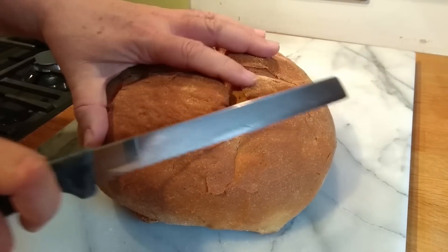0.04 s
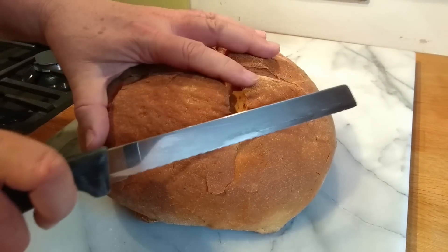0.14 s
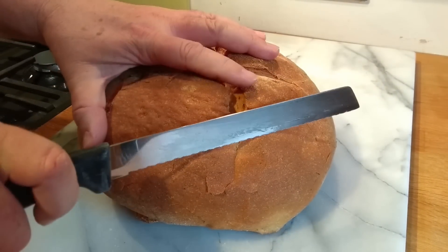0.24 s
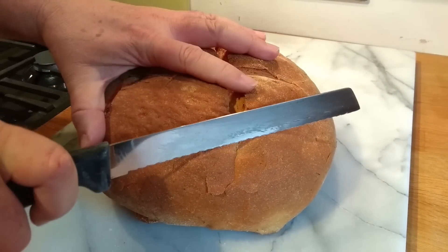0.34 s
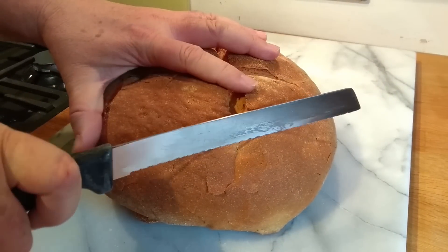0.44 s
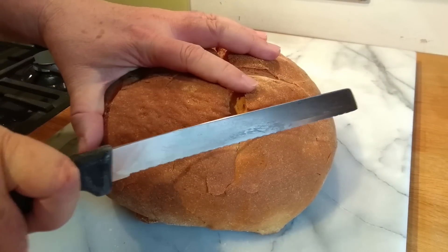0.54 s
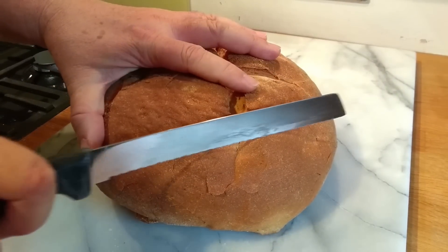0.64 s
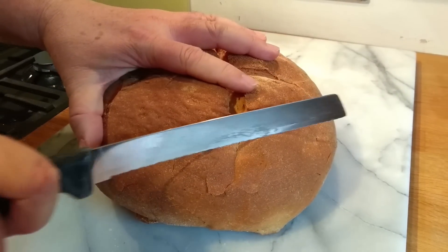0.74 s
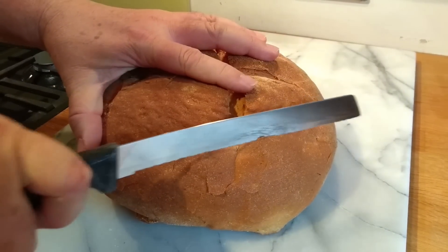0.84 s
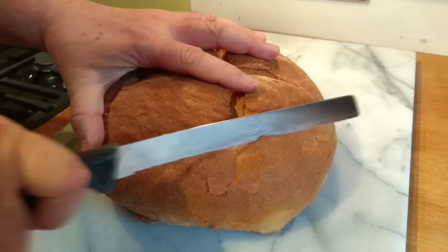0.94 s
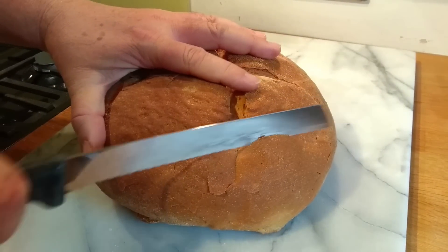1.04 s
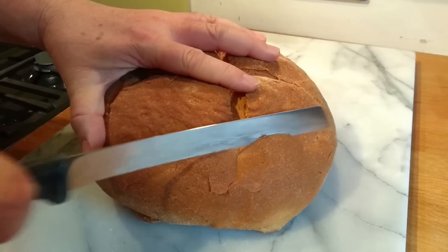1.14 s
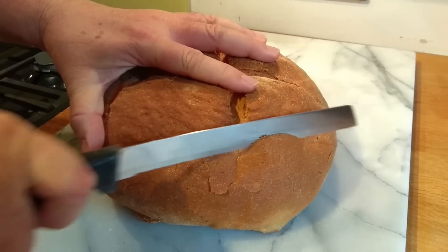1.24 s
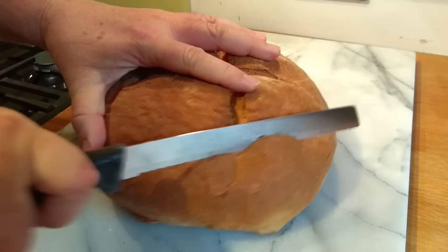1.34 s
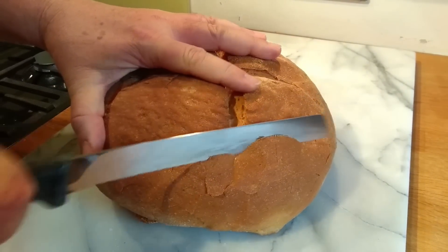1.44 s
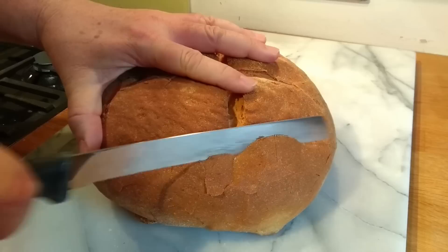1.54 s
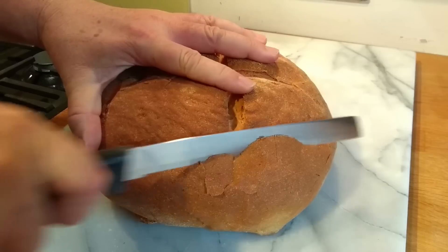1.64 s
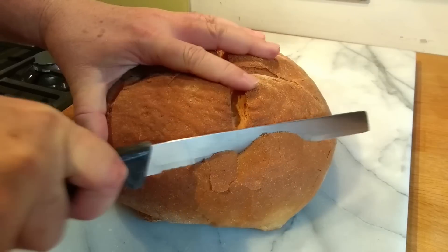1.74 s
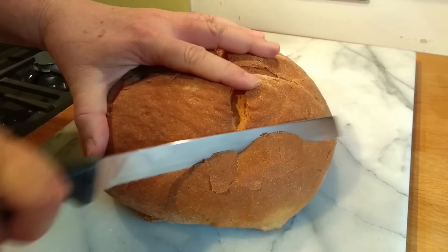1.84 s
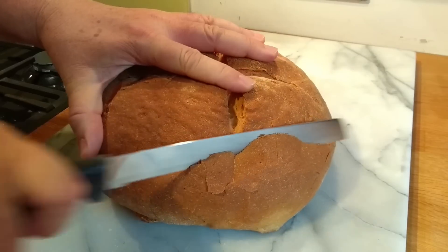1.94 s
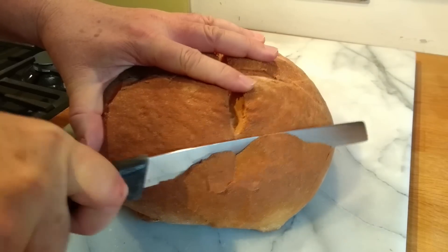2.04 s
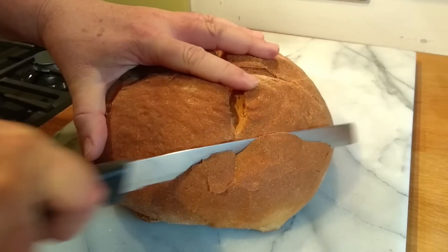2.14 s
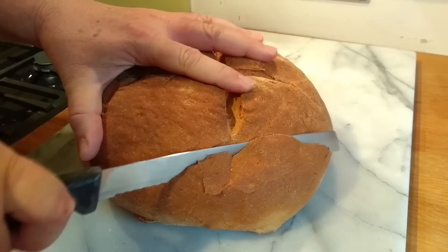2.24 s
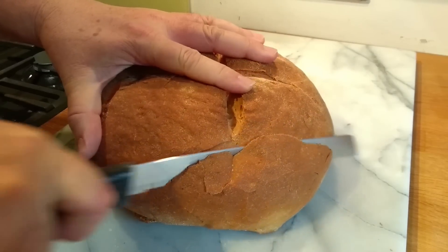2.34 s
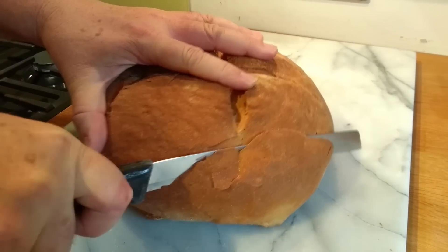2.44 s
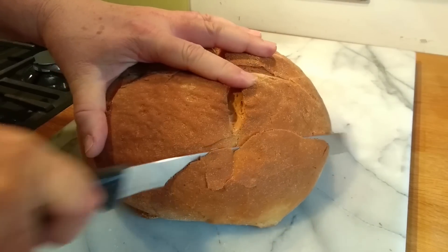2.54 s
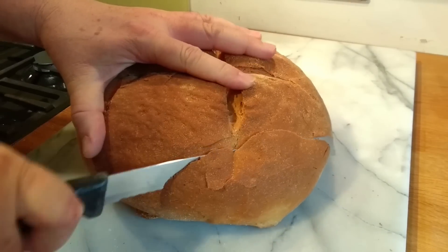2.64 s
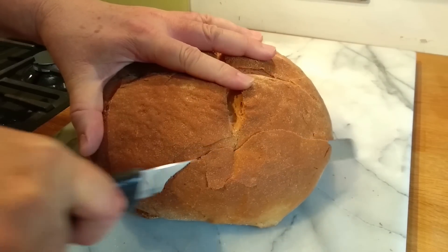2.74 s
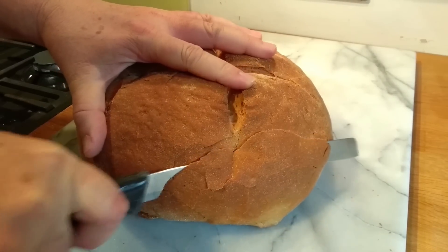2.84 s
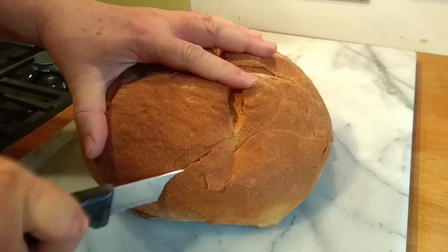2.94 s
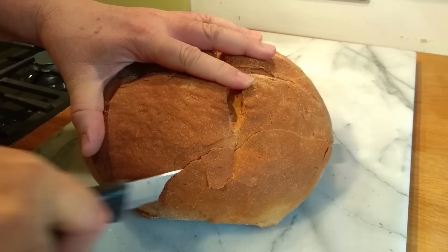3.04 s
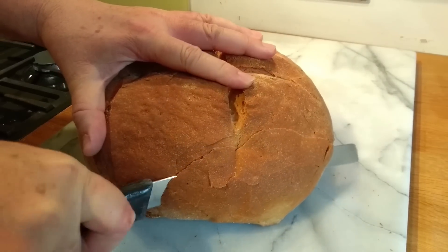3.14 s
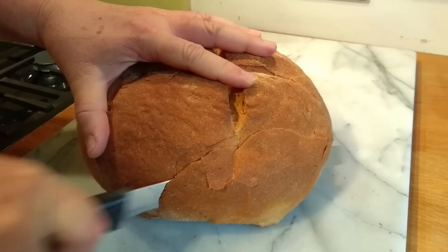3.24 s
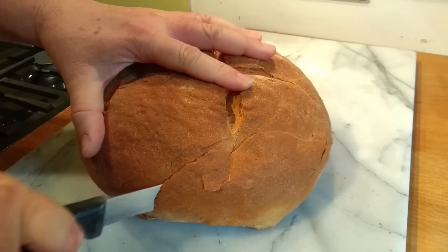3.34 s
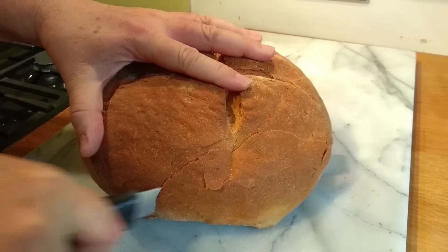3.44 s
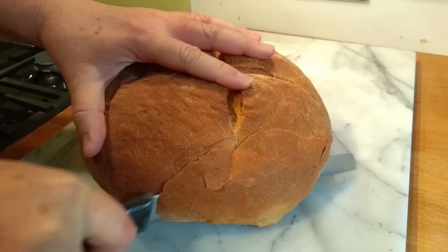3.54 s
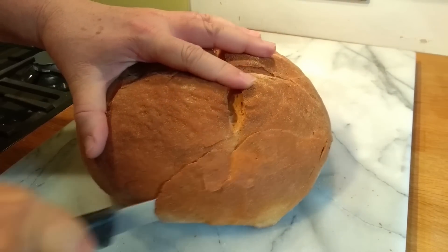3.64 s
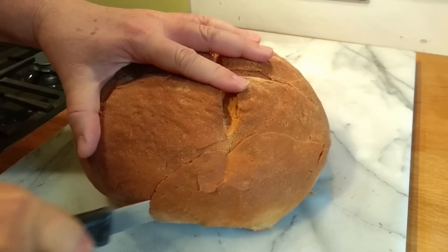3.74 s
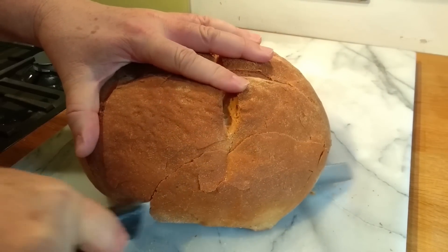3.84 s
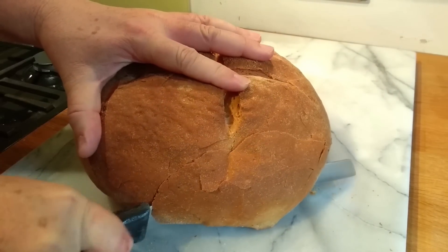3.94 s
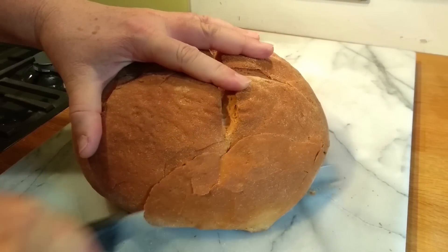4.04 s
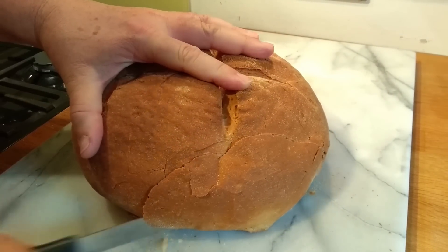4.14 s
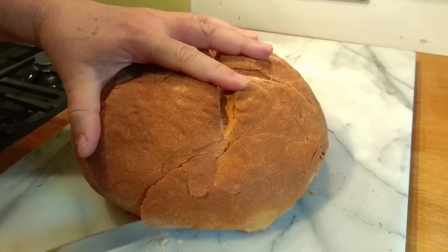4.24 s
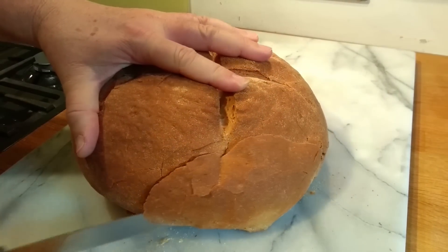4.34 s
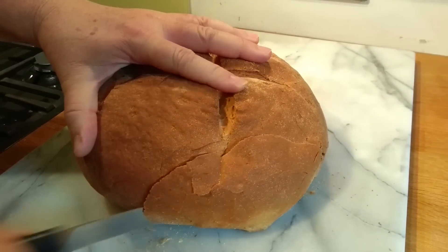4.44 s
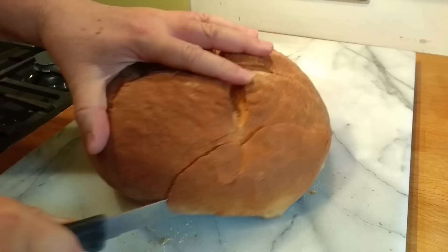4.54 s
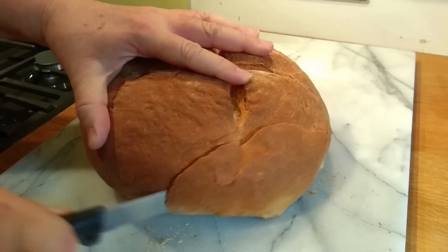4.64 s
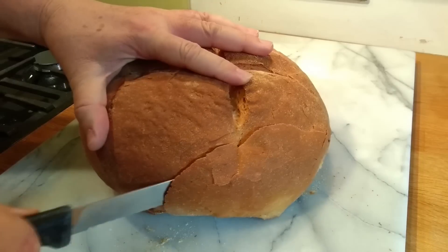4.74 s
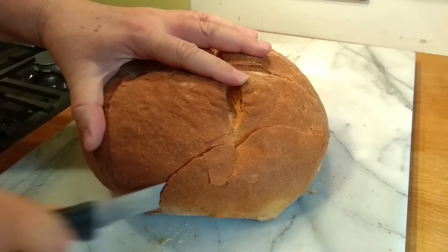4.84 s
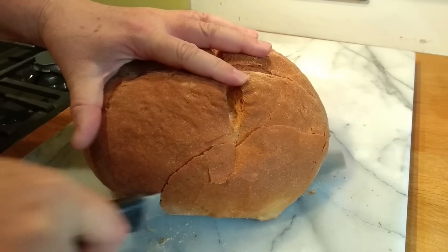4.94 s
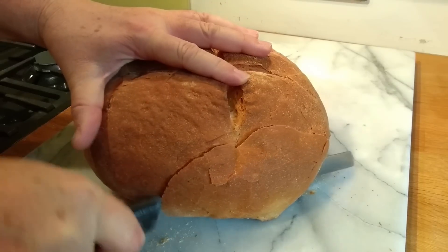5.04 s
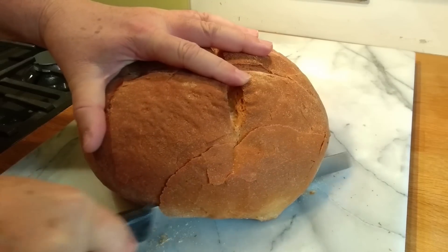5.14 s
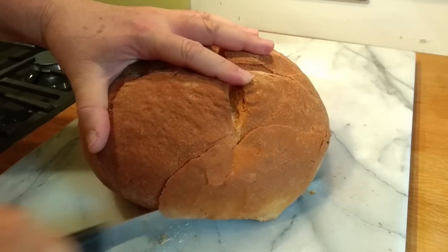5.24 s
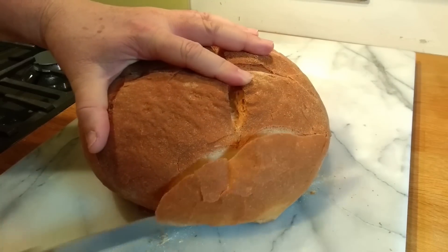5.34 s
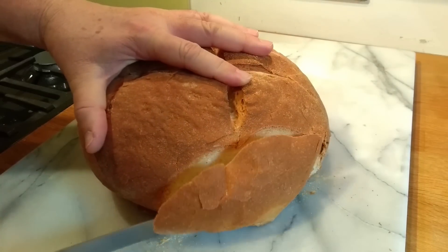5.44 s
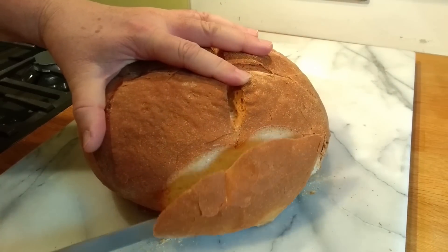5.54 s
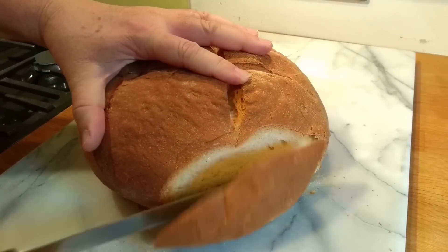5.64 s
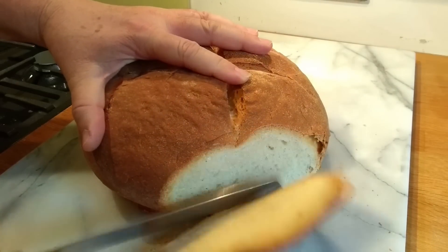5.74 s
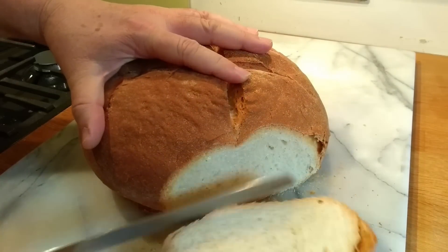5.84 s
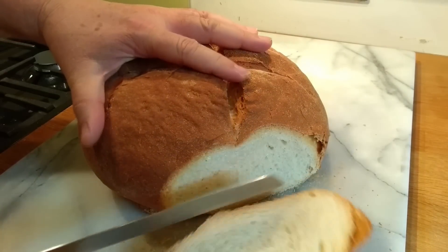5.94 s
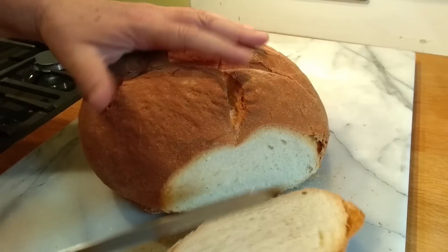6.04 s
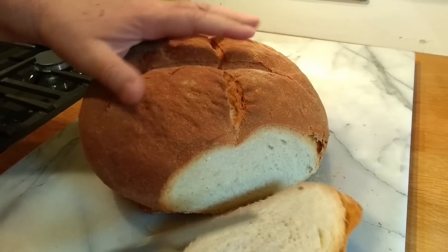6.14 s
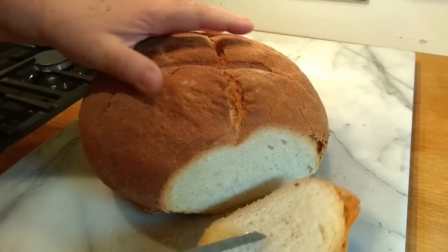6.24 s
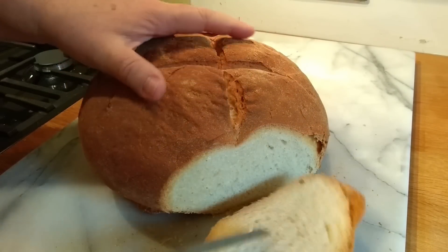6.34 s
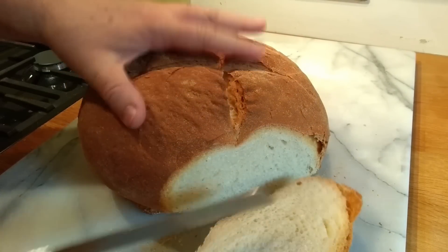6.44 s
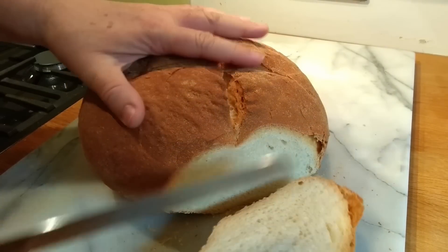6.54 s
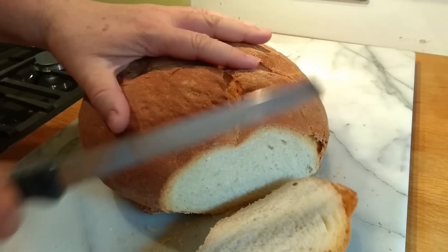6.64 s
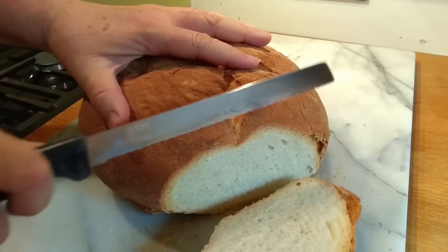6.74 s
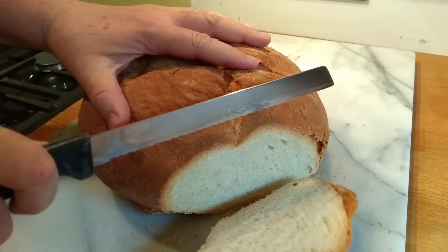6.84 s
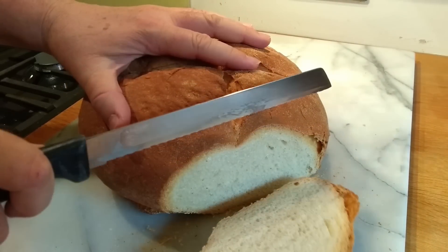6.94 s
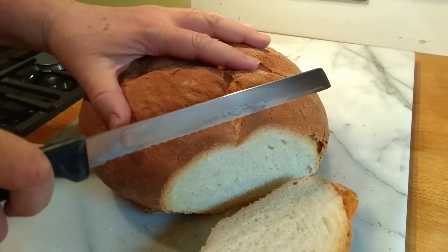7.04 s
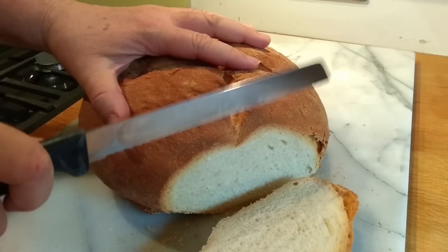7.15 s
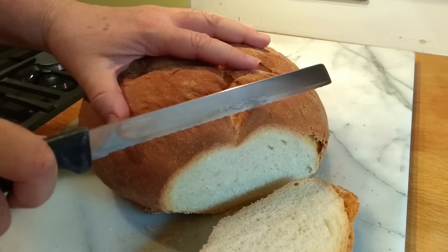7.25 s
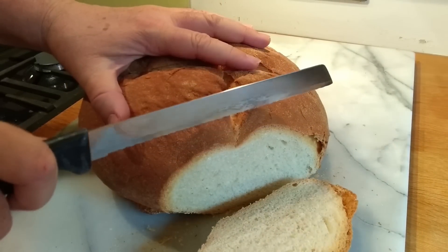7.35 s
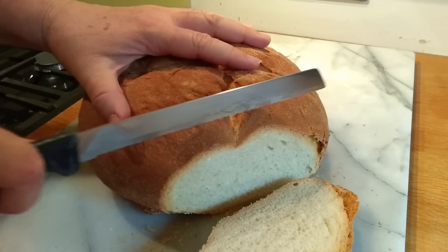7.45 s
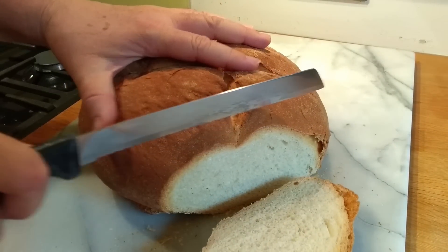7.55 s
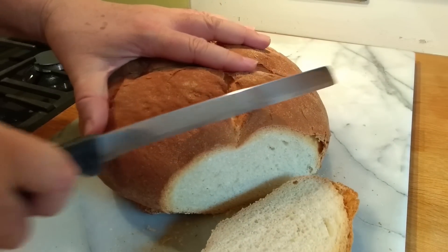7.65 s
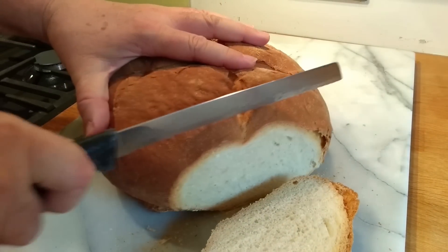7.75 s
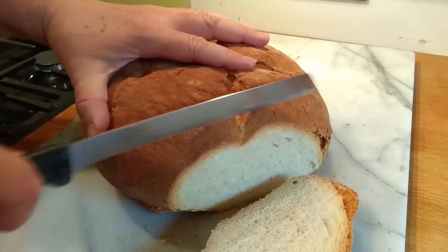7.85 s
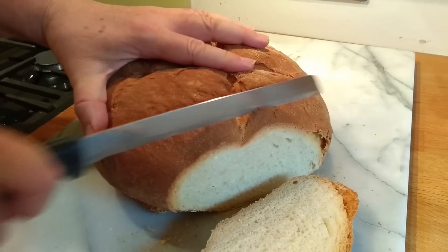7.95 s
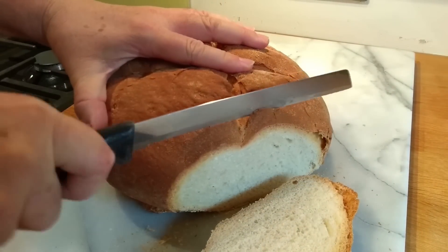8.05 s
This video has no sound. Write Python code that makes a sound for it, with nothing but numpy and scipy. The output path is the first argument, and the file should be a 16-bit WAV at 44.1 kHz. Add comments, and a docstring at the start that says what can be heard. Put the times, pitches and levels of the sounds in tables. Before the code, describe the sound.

Close, rhythmic sawing of a bread knife through hard crust, with sharp cracks and a few knocks and scrapes on stone.

```python
"""A quiet kitchen, the phone microphone close to a crusty loaf on a stone slab.
A serrated knife saws through it: the teeth catch and shake the loaf, the crust crumbles and cracks,
the inside tears, and the slab rocks on the counter. Blade, handle and the falling slice knock on the
stone, the edge drags over it and fingers brush the crust, all with a short room tail and a faint hush."""
import sys
import numpy as np
from scipy import signal
from scipy.fft import rfft, irfft, next_fast_len
from scipy.io import wavfile
from scipy.ndimage import uniform_filter1d, map_coordinates

SR = 44100
rng = np.random.default_rng(int(sys.argv[2]) if len(sys.argv) > 2 else 0)


def wav_record(signal):
    """Record a signal, one row per channel, as 16-bit PCM in the file named by sys.argv[1]."""
    frames = np.transpose(np.atleast_2d(signal))
    bounded = np.clip(frames, -1, 1)
    # unit amplitude maps onto the largest positive 16-bit level
    quanta = np.round(bounded * 32767).astype(np.int16)
    wavfile.write(sys.argv[1], SR, quanta)


N = 357651

# Saw strokes. Each row: time of full pressure, rise, hold and release in seconds, then in dB the swell
# over the hold, crumbling, loaf shaking, tearing, slab rocking and counter drumming.
SAW_STROKES = [(0.635, 0.056, .02, 0.1, -5, -45, -37.5, -50.5, -46, -44),
               (0.802, .035, .06, 0.2, 1.5, -39.5, -34, -44.5, -42.5, -41.5),
               (0.992, 0.029, .07, 0.19, -4, -31.5, -28, -34, -40, -37.5),
               (1.203, 0.047, .075, 0.18, -5.5, -28.5, -23, -30.5, -31.5, -29),
               (1.406, 0.038, .055, 0.19, -3, -28.5, -25, -32, -30.5, -36),
               (1.601, 0.051, .075, 0.19, 1.5, -28, -23.5, -29, -43, -34.5),
               (1.802, 0.038, .065, 0.15, 2.5, -30, -31.5, -32, -44.5, -39.5),
               (1.988, 0.039, .09, 0.17, 5, -30, -31, -32, -48, -37.5),
               (2.195, 0.043, .05, 0.16, -5, -23.5, -27.5, -25, -36.5, -35),
               (2.367, 0.032, .04, 0.16, 3, -23.5, -25.5, -26.5, -41.5, -29),
               (2.561, 0.038, .04, 0.11, -1.5, -24.5, -25.5, -30.5, -57.5, -30.5),
               (2.73, 0.042, .07, .11, -4.5, -24.5, -19.5, -26, -39.5, -30),
               (2.905, .045, .055, 0.084, -1.5, -29.5, -27.5, -34, -44, -45),
               (3.052, 0.03, .07, 0.1, 4, -33.5, -27, -35.5, -56.5, -33.5),
               (3.266, 0.036, .045, 0.078, 1.5, -31, -35.5, -43, -60, -68),
               (3.433, 0.034, .045, .14, 3, -30, -28.5, -37, -54, -34.5),
               (3.642, 0.04, .03, 0.078, 2, -35.5, -39.5, -48.5, -62, -62),
               (3.802, 0.024, .09, 0.065, 1, -40, -38.5, -47.5, -41.5, -36.5),
               (4.048, .022, .045, 0.22, 7.5, -39.5, -40, -46.5, -63.5, -57),
               (4.182, 0.091, .006, .03, 14, -48.5, -42, -47, -53.5, -38.5),
               (4.543, 0.041, .02, 0.12, -6.5, -59.5, -40, -52, -50, -66),
               (4.622, 0.054, .015, 0.11, -2, -56.5, -81, -66, -42.5, -82),
               (4.918, 0.029, .07, 0.12, 1.5, -36.5, -35, -40, -51.5, -42),
               (5.244, 0.08, .06, .01, 5.5, -37.5, -33, -36, -52.5, -39.5),
               (7.502, 0.065, .005, 0.094, 4, -73, -43.5, -91, -52, -53),
               (7.651, 0.056, .04, 0.14, 1, -41, -30, -45, -45.5, -36.5),
               (7.799, 0.034, .055, 0.19, -1, -39.5, -26.5, -40.5, -49, -36.5),
               (7.955, .03, 0.062, 0.2, 2, -36, -26.5, -37, -45, -34),
               (8.105, 0.12, .02, .05, 1, -43.5, -41, -49.5, -41, -44.5)]
# For those five sounds in turn: the exponent on pressure, and the lag in seconds.
PRESSURE_POWERS = [3.4, 3.97, 3.8, 1, 3.8]
LAGS_S = [-0.005, -0.0021, 0.0025, 0.00062, 0.013]
# Light touches on the crust. Each row: time of full pressure, rise, hold and release in seconds,
# then swell, rustle, loaf shaking and steel singing in dB.
TOUCHES = [(0.048, 0.01, 0.0046, 0.15, 3, -61, -68, -76), (0.27, .03, 0.0092, 0.07, -9, -72, -71, -90),
           (4.45, 0.12, 0.42, 0.09, -12, -68, -70.5, -70.5), (5.99, .05, 0.13, 0.049, -2.5, -70, -79, -83),
           (6.252, .01, .005, .08, 4, -73, -76, -85), (6.43, 0.032, .045, .09, 2, -68, -72, -89),
           (6.59, .07, .02, .2, 2, -70.5, -84, -83), (6.88, .06, .09, .1, 3.5, -78, -80, -69.5),
           (7.0, 0.097, 0.15, .06, 0, -75.5, -85, -82), ]
# The stone's modes. Each row: pitch in Hz, level in dB, time to fall 60 dB in seconds.
SLAB_MODES = [(83, 1, .14), (124, 2, 0.096), (206, 2, 0.096), (470, -9, 0.032), (810, -0.5, 0.027),
              (1130, -4, 0.04), (1420, 0.5, .06), (1710, -2, 0.052), (2054, -0.5, 0.13), (2635, -0.5, .07),
              (3320, 2.5, .06)]
# Modes of the blade, and of the slab rocking on the counter. Each row: pitch and width in Hz, level in dB.
BLADE_MODES = [(1110, 53, -0.5), (1650, 120, -4.5), (2570, 240, -1.5), (3900, 300, -4), (5320, 600, -1.5),
               (6550, 320, -0.5), (8000, 87, -10)]
ROCKING_MODES = [(78, 40, 0), (134, 170, -13)]


def sawing(teeth_hz=466.2):
    """Teeth catch in turn, shaking and tearing the loaf. Returns the cut and the rumble beneath it."""
    # Modes of the loaf and the counter. Each row: pitch in Hz, width in Hz, level in dB.
    loaf_modes = [(420, 170, -2.5), (616, 100, 0.5), (842, 150, -2), (1210, 530, -9.5)]
    counter_modes = [(172, 17, -7), (196, 4.6, 5.5), (282, 28, -2)]
    # Tearing fibres. Each row: frequency in Hz, spectral level in dB.
    fibre_spectrum = [(700, -38.5), (1300, -2.5), (2000, 1.5), (3500, -3), (4700, -1), (6500, -30)]
    crumble, shake, tear, rock, drum = contacts(SAW_STROKES, PRESSURE_POWERS, LAGS_S)
    shake = shake + contacts(TOUCHES, PRESSURE_POWERS[:3], LAGS_S)[1]
    teeth_passed = np.cumsum(teeth_hz * arm_speed() * np.exp(0.06 * wobble(9) + .04 * wobble(60))) / SR
    catches = np.diff(np.floor(teeth_passed), prepend=0)
    catches *= amp(0.83 * rng.standard_normal(N) + 3.3 * wobble(45))
    catches = unit(catches - catches.mean())
    bite = lambda: amp(1.2 * np.cos(2 * np.pi * teeth_passed) + 0.5 * wobble(90))  # tooth pressure
    push = 0.55 * catches + bite() * grit(1200, 1.9, smooth=0.29)
    loaf = unit(filtered(push, lambda f: body(loaf_modes)(f) * 1j * f / (260 + 1j * f)))
    hollow = unit(filtered(catches + 0.89 * rng.standard_normal(N), lambda f: body(loaf_modes[:1])(f) ** 2))
    gentle = np.clip(.75 - 2.2 * tear / (shake + 1e-9), .1, .8)  # little tearing: the lowest mode leads
    loaf = np.sqrt(gentle) * hollow + np.sqrt(1 - gentle) * loaf
    fibres = coloured(bite() * amp(2.0 * wobble(120)) * grit(3000, 2.9, smooth=0.58), fibre_spectrum)
    cut = shake * loaf + crumble * crumbs(bite()) + tear * fibres
    return cut, rock * rumble(ROCKING_MODES) + drum * rumble(counter_modes)


def arm_speed(slowing_per_s=1.6):
    """The arm slows through each stroke; its relative speed passes 1 at 50 ms after full pressure."""
    t = np.arange(N) / SR
    full_at, rise = np.transpose(SAW_STROKES)[:2]
    stroke = np.clip(np.searchsorted(full_at - rise, t) - 1, 0, None)
    return np.exp(-slowing_per_s * np.clip(t - full_at[stroke] - .05, -.1, .12))


def crumbs(bite):
    """Crust breaks into crumbs, in clumps."""
    # Each row: frequency in Hz, spectral level in dB.
    crumb_spectrum = [(2500, -25.5), (4300, -17), (5100, -3), (6400, -0.5), (7300, -4), (9500, -15.5),
                      (11500, -7.5), (14500, -11), (16000, -5.5)]
    return coloured(bite * amp(1.6 * wobble(140)) * grit(3500, 4.6, smooth=.5), crumb_spectrum)


def cracks():
    """A plate of crust snaps: a few cycles at its own pitch and a bright splinter."""
    # Each row: start in seconds, level in dB, pitch in Hz.
    crust_snaps = [(0.9792, -22.5, 6486), (1.6018, -18, 5848), (1.819, -11, 7256), (2.0597, 5, 6660),
                   (2.0702, -1.5, 3100), (2.073, -2, 5600), (2.1007, -10.5, 4860), (2.3566, -4, 5910),
                   (2.3705, 3, 6320), (2.3808, 4.5, 7200), (2.4033, 1.5, 6140), (2.4658, -12.5, 6850),
                   (2.5293, -13.5, 5840), (2.5471, -9, 5050), (2.6239, -16, 6500), (2.7244, -15, 5660),
                   (2.7445, -6.5, 3870), (3.257, -23, 6800), (3.4295, -22.5, 4450), (3.8604, -14, 2482),
                   (4.0064, -22, 5590), (4.0894, -29, 6910), (4.5411, -20.5, 2560), (4.624, -33, 5900),
                   (4.9142, -16.5, 5890), (5.8731, -53, 5200), (6.2527, -49.5, 6860), (6.4178, -52, 5520)]
    out, t = np.zeros(N + SR), np.arange(SR // 50) / SR
    for start, db, hz in crust_snaps:
        snap = np.sin(2 * np.pi * hz * t) * np.sin(np.pi * np.clip(t / .00055, 0, 1))
        splinter = np.diff(rng.standard_normal(len(t) + 1))
        splinter *= 0.2 * decay(t, .008) + 0.017 * decay(t, 0.031)
        out[round(start * SR):][:len(t)] += amp(db - 1.5) * (snap + splinter)
    return out[:N]


def knocks():
    """Knocks ring the slab, soft ones leaving out its high modes; loose crumbs rattle after them."""
    # Each row: start in seconds, level in dB, tilt above the hollow pitch in dB per octave,
    # thump in dB, rattle decay in seconds (capped below), hollow pitch in Hz.
    slab_knocks = [(0.129, -38, -18, -20, 0.22, 595), (0.484, -26.5, -10.5, -42, 0.14, 477),
                   (4.191, -18.5, -10, -27, 0.12, 736), (4.204, -14.5, -15, -16, 0.35, 1533),
                   (4.435, -51, -11, -40, .12, 800), (4.474, -52, -5, -40, .12, 2600),
                   (5.306, -11.5, -6, -21.5, 0.36, 1392), (5.407, -5, 1, -17.5, 0.33, 2305),
                   (5.427, -9, -1, -8, 0.094, 756), (5.774, -16, -6.5, -17, 0.13, 576),
                   (6.819, -38, -21, -5, 0.11, 829), (7.134, -51, -17, -30, .08, 950),
                   (7.201, -15.5, -8.5, -11.5, 0.096, 620), (7.484, -37, -21, -27, 0.1, 503)]
    out, t = np.zeros(N + SR), np.arange(SR // 2) / SR
    mode_hz, bins = np.array(SLAB_MODES)[:, 0], np.fft.rfftfreq(len(t), 1 / SR)
    for start, db, tilt_db, thump_db, t60, hollow_hz in slab_knocks:
        # The place struck favours one mode.
        hollow_db = lambda f: 12 * np.exp(-(np.log2(f / hollow_hz + 0.00083) / 0.21) ** 2)
        treble_db = lambda f: tilt_db * np.log2(np.maximum(f / hollow_hz, 1))
        colour_db = lambda f: np.where(f < 230, thump_db + 15, treble_db(f) + hollow_db(f))
        band = amp(colour_db(bins) - 0.55 * hollow_db(bins)) * (bins > 300) / (1 + (bins / 3300) ** 3)
        rattle = unit(irfft(rfft(rng.standard_normal(len(t))) * band, len(t)))
        rattle *= 2.5 * decay(t, 0.0065) + 0.66 * decay(t, min(t60, .24))
        tick = .12 * uniform_filter1d(rng.standard_normal(len(t)), size=7) * decay(t, 0.21)
        knock = slab_ring(t, colour_db(mode_hz)) + rattle + tick
        attack = 1 - np.exp(-t / .00022)
        out[round(start * SR):][:len(t)] += amp(db - 11) * knock * attack
    return out[:N]


def slab_ring(t, gains_db):
    """Modes ring at new strengths each knock; low ones build slowly, high ones wander in phase."""
    out = np.zeros(len(t))
    for (hz, db, t60), gain_db in zip(SLAB_MODES, gains_db):
        envelope = amp(db + gain_db + rng.normal(0, 2.8)) * decay(t, t60) * (1 - np.exp(-hz * t / 0.48))
        drift = 0.12 * hz / 1000 * np.cumsum(rng.standard_normal(len(t)))
        out += envelope * np.sin(2 * np.pi * hz * t + drift)
    return out


def blade_clack():
    """Steel meets stone: a sharp clack and a short chatter, heard through the damped blade."""
    # Each row: start in seconds, level in dB.
    edge_hits = [(5.016, -14.5)]
    push, t = np.zeros(N + SR), np.arange(SR // 2) / SR
    envelope = 2.2 * decay(t, .012) + 1.8 * decay(t, 0.041) + 0.7 * decay(t, 0.36)
    for start, db in edge_hits:
        push[round(start * SR):][:len(t)] += amp(db) * envelope * rng.standard_normal(len(t))
    return filtered(push[:N], lambda f: 2.4 * body(BLADE_MODES)(f) + .15)


def edge_drag():
    """Grit under the edge excites the slab, damped by the loaf. Returns the scrape and the rocking."""
    # Each row: time of full pressure, rise, hold and release in seconds,
    # then swell, scrape, crushed crumbs, slab rocking and blade chatter in dB.
    drags = [(4.209, .006, 0.0074, .17, -6, -17.5, -54.5, -42, -54),
             (5.025, .012, 0.008, 0.12, -5, -25, -24.5, -60.5, -40),
             (5.11, 0.062, 0.017, 0.092, -1.5, -50.5, -63.5, -42.5, -70),
             (5.31, .005, 0.098, 0.01, 0.5, -21, -33.5, -29.5, -33.5),
             (5.412, .006, 0.011, 0.22, -1.5, -21.5, -35.5, -20.5, -23)]
    scrape, crush, rock, chatter = contacts(drags, [2.8, 2, 3.6, 3.4], lags_s=[0.0016, .001, .015, .001])
    stone = body([(hz, 1.8 / t60 * 3.8, db) for hz, db, t60 in SLAB_MODES if 400 < hz < 2300])
    grains = amp(0.95 * wobble(70)) * grit(1500, 5.2, smooth=0.91)
    grind = unit(filtered(grains, lambda f: (stone(f) + 0.15) / (1 + 1j * f / 3200) ** 2))
    steel = unit(filtered(grit(2000, 2.3, smooth=.5), body(BLADE_MODES[1:4])))
    return scrape * grind + chatter * steel + crush * crumbs(1), rock * rumble(ROCKING_MODES)


def rumble(modes):
    """Uneven pushes shake a heavy body."""
    return unit(filtered(amp(1.7 * wobble(25)) * rng.standard_normal(N), body(modes)))


def brushing():
    """Skin and flat steel slide over the crust; the steel sings faintly."""
    # Skin on crust. Each row: frequency in Hz, spectral level in dB.
    rustle_spectrum = [(1000, -3), (4500, -15), (5300, 1), (7200, -0.5), (8500, -15.5), (15000, -12)]
    # The blade lying flat. Each row: pitch in Hz, width in Hz, level in dB.
    flat_blade_modes = [(3380, 1300, 0)]
    rustle, _, sing = contacts(TOUCHES, PRESSURE_POWERS[:3], LAGS_S)
    skin = coloured(grit(3300, 2.5, smooth=.6), rustle_spectrum)
    steel = unit(filtered(grit(2000, 2.54, smooth=.6), body(flat_blade_modes)))
    return rustle * skin + sing * steel


def kitchen(x):
    """The room answers briefly, the treble lasting longest."""
    # Each row: frequency in Hz, time to fall 60 dB in seconds.
    room_decay = [(200, 0.1), (2000, 0.1), (4500, 0.11), (10000, 0.26)]
    hz, t, noise = signal.stft(rng.standard_normal(SR // 2), SR, nperseg=256)
    tail = signal.istft(noise * decay(t, along(room_decay, hz)[:, None]), SR, nperseg=256)[1]
    return signal.fftconvolve(np.pad(x, (150, 0)), tail / np.linalg.norm(tail))[:N]


def hush(level_db=-68):
    """Room air and microphone noise waver slightly in level."""
    # Each row: frequency in Hz, spectral level in dB.
    hush_spectrum = [(15, -31.5), (25, -6.5), (80, 6), (229, -3), (545, -10.5), (591, -12), (1100, -18),
                     (1230, -15.5), (1480, -18), (2550, -21), (16000, -26.5)]
    return amp(level_db + .8 * wobble(3.5)) * coloured(rng.standard_normal(N), hush_spectrum)


def contacts(rows, exponents, lags_s, grip=0.41):
    """A gain curve per level column: pressure rises fast as the teeth grip, holds, then lets go."""
    t = np.arange(N) / SR
    power = np.zeros((len(exponents), N))
    for full_at, rise, hold, fall, swell_db, *levels in rows:
        near = slice(max(round((full_at - .3) * SR), 0), round((full_at + .8) * SR))
        rise, hold, fall = np.maximum([rise, hold, fall], 1e-3)
        for k, db in enumerate(levels):
            since = t[near] - full_at - lags_s[k]
            pressure = np.clip(1 + since / rise, 0, 1) ** grip * np.clip(1 - (since - hold) / fall, 0, 1)
            gain = amp(db + swell_db * np.clip(since / hold, 0, 1))
            power[k, near] += (pressure ** exponents[k] * gain) ** 2
    return np.sqrt(power)


def grit(per_second, spread_db, smooth):
    """Random tiny breaks with a few large ones, on a share of smooth rubbing noise."""
    size, sign, chance = rng.random((3, N))
    breaks = amp(-spread_db * np.log(size + 4e-3)) * np.sign(sign - .5) * (chance < per_second / SR)
    return np.sqrt(1 - smooth) * unit(breaks) + np.sqrt(smooth) * rng.standard_normal(N)


def body(modes):
    """Causal frequency response of a set of resonances."""
    return lambda f: sum((-1) ** k * amp(db) * 1j * f * width / (hz * hz - f * f + 1j * f * width)
                         for k, (hz, width, db) in enumerate(modes))


def filtered(x, response):
    """x through a complex frequency response."""
    size = next_fast_len(N + SR // 2)
    return irfft(rfft(x, size) * response(np.fft.rfftfreq(size, 1 / SR)), size)[:N]


def coloured(x, spectrum):
    """x shaped by (Hz, dB) points, at unit RMS."""
    return unit(filtered(x, lambda f: amp(along(spectrum, f))))


def along(points, hz):
    """Interpolate (Hz, value) points on a log axis."""
    knots_hz, values = np.transpose(points)
    return np.interp(np.log(hz + 1), np.log(knots_hz + 1), values)


def wobble(rate):
    """A smooth random curve, rate knots a second."""
    return map_coordinates(rng.standard_normal(int(N * rate / SR) + 4), [np.arange(N) * rate / SR])


def decay(t, t60):
    return amp(-60 * t / t60)


def amp(db):
    return 10 ** (np.asarray(db) / 20)


def unit(x):
    return x / np.sqrt(np.mean(x ** 2) + 1e-20)


def scene():
    """Knife, loaf and slab up close, the kitchen behind them, in mono."""
    cut, cut_rumble = sawing()
    scrape, scrape_rumble = edge_drag()
    hits = cracks() + knocks() + blade_clack()
    direct = cut + scrape + cut_rumble + scrape_rumble + hits + brushing()
    room = kitchen(amp(-11.5) * (cut + scrape) + amp(-7.5) * hits)
    return (direct + room + hush())[None]


def record(dry, bass_hz=40, top_hz=15800):
    """The microphone drops the deepest bass, rounds off the loudest cracks and cuts the highest treble."""
    bass_cut = filtered(dry[0], lambda hz: (1j * hz / (bass_hz + 1j * hz)) ** 4)
    limited = bass_cut / (1 + np.abs(bass_cut) ** 8) ** (1 / 8)
    return filtered(limited, lambda hz: np.sin(np.pi / 2 * np.clip((top_hz - hz) / 200, 0, 1)) ** 2)[None]


dry = scene()
out = record(dry)
wav_record(out)
```